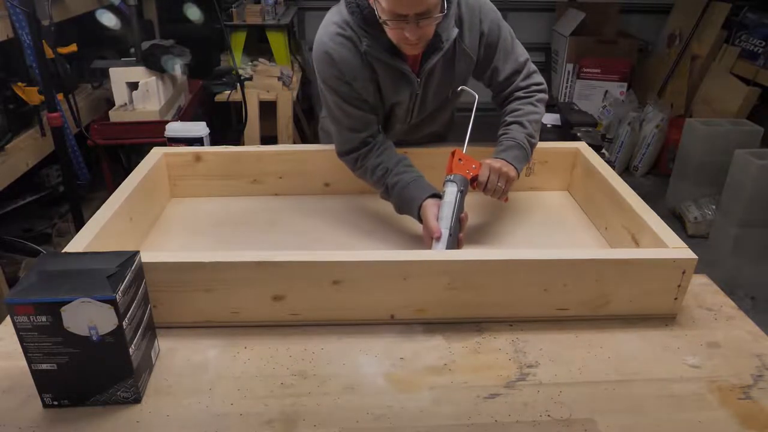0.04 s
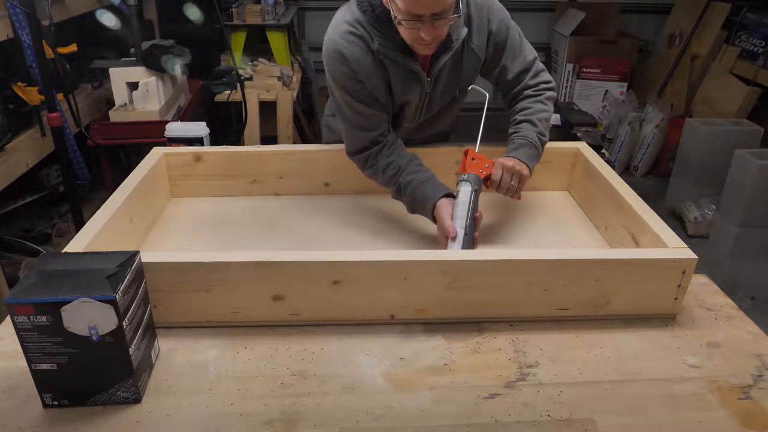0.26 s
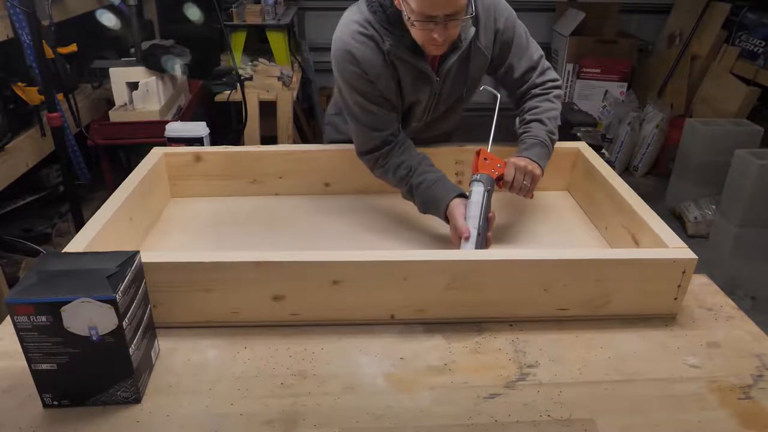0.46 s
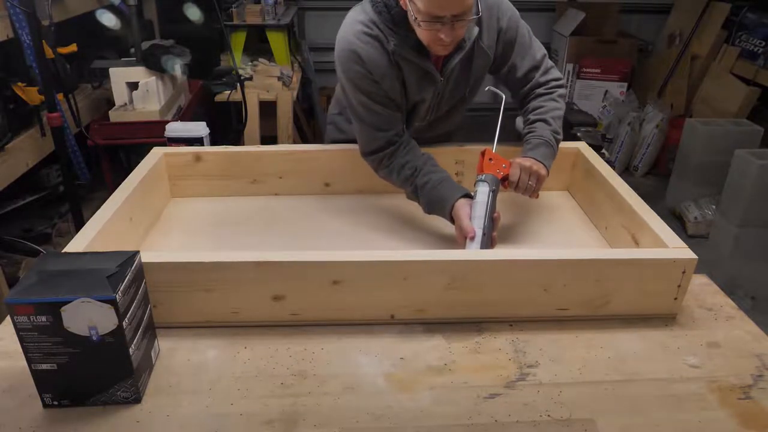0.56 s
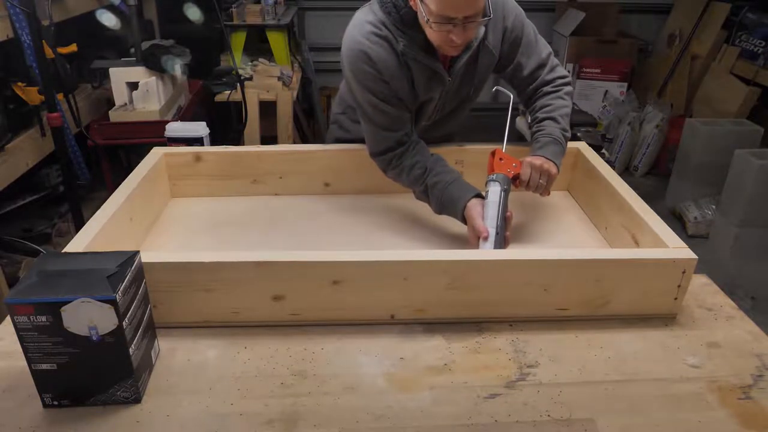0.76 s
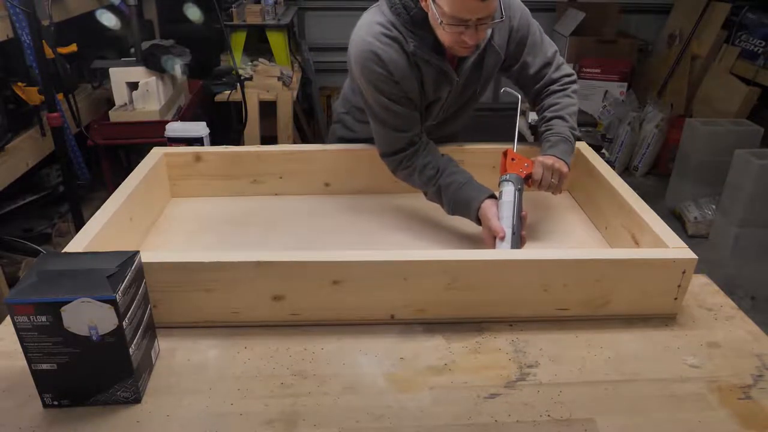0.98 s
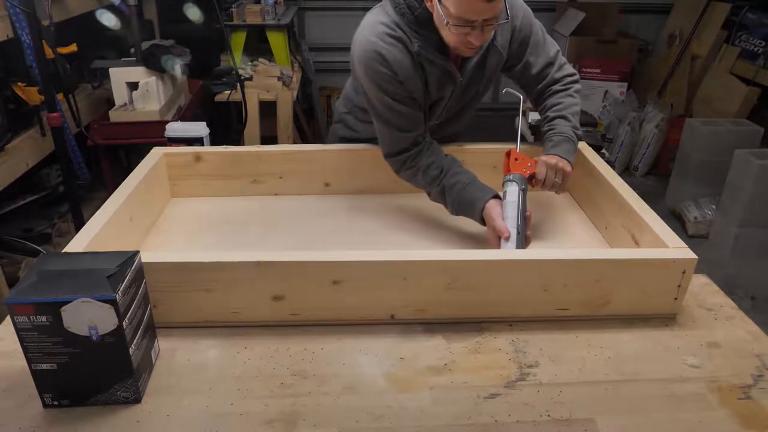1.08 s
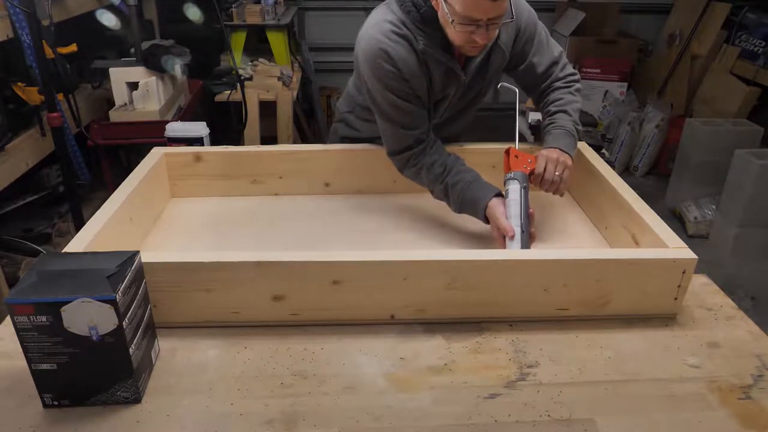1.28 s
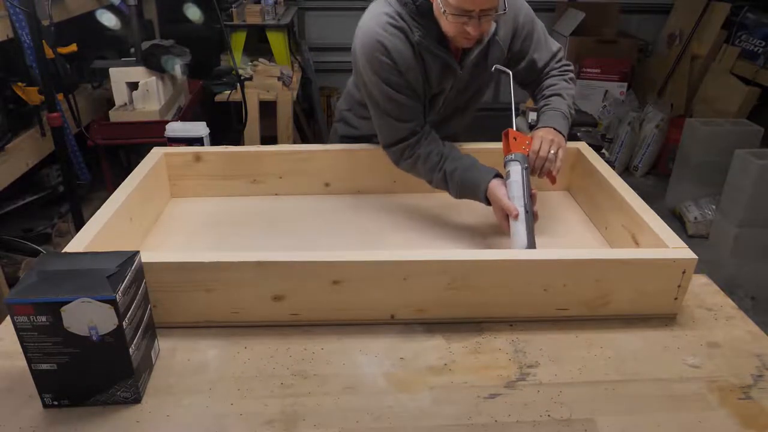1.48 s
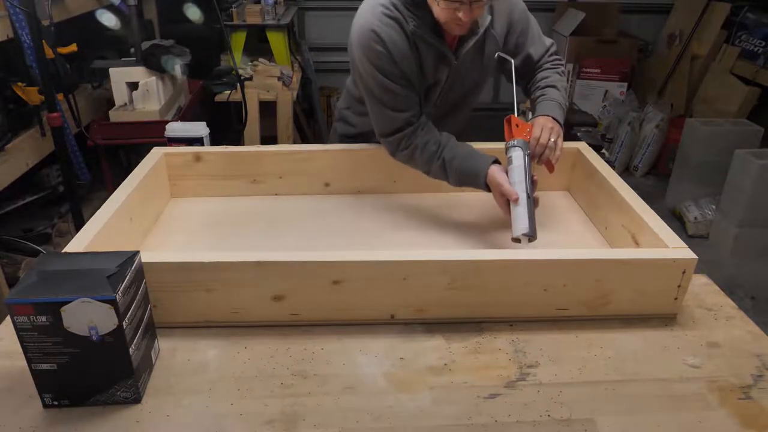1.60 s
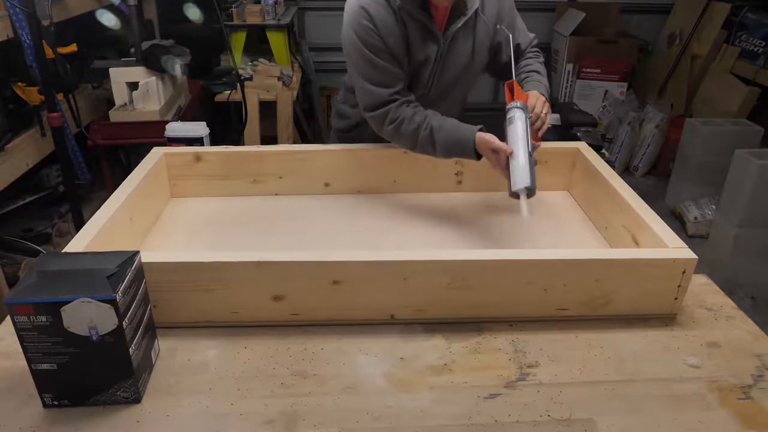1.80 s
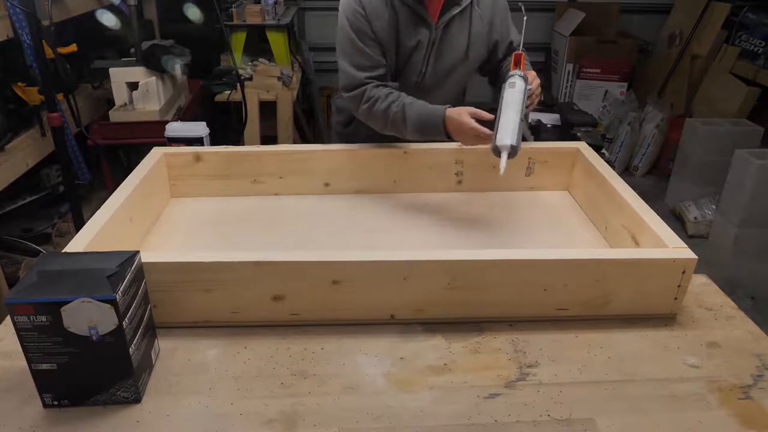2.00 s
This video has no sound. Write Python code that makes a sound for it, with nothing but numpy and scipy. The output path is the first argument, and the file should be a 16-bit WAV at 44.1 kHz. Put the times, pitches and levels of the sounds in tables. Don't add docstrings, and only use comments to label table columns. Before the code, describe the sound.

A caulking gun scrapes along a wooden box, boards humming low; a bright ratchet snap rings, small ticks follow, then a second, duller snap, cloth rustle and a faint lever clack, heard close in a reverberant garage.

```python
import sys
import numpy as np
from scipy import signal
from scipy.fft import rfft, irfft
from scipy.io import wavfile
from scipy.ndimage import uniform_filter1d

SR = 44100
rng = np.random.default_rng(int(sys.argv[2]) if len(sys.argv) > 2 else 0)


def attenuation_scalar(level_db):
    decades = np.asarray(level_db, float) / 20
    return 10 ** decades


def wrap_up_sound(samples):
    columns = np.atleast_2d(samples).T
    tamed = np.clip(columns, -1, 1)
    steps = np.round(tamed * 32767).astype(np.int16)
    wavfile.write(sys.argv[1], SR, steps)


N = 90404
SPAN, TAPS = 4096, 1024


def evened(x):
    return x / np.sqrt(np.mean(x ** 2) + 1e-20)


def read(points, hz):
    f, value = np.transpose(points)
    return np.interp(np.log(hz + 1), np.log(f + 1), value)


def curve(points):
    return np.interp(np.arange(N) / SR, *np.transpose(points))


def colour(x, points):
    hz = abs(np.fft.fftfreq(2 * TAPS, 1 / SR))
    low_end = (points[0][0] / 2, points[0][1] - 20)
    log_gain = np.log(attenuation_scalar(read([low_end] + list(points), hz)))
    phase = -signal.hilbert(log_gain).imag
    response = np.fft.ifft(np.exp(log_gain + 1j * phase)).real[:TAPS]
    return signal.oaconvolve(x, response)[:len(x)]


def ring(x, peaks, damping):
    out = np.zeros(len(x))
    for k, (hz, width, db) in enumerate(peaks):
        r = np.exp(-np.pi * width * damping / SR)
        poles = [1, -2 * r * np.cos(2 * np.pi * hz / SR), r * r]
        out += (-1) ** k * attenuation_scalar(db) * signal.lfilter([1 - r, 0, r - 1], poles, x)
    return out


def slips(size, per_s, spread_db):
    chance, draw, sign = rng.random((size, 3)).T
    level_db = spread_db * np.minimum(-np.log(draw + 1e-9), 4)
    return (chance < per_s / SR) * np.sign(sign - .5) * attenuation_scalar(level_db)


def pair(a, b, same):
    c = np.clip(read(same, np.fft.rfftfreq(len(a), 1 / SR)), 0, .97)
    mid = rfft(a) * np.sqrt((1 + c) / 2)
    side = rfft(b) * np.sqrt((1 - c) / 2)
    return np.array([irfft(mid + side, len(a)), irfft(mid - side, len(a))])


def placed(s, sound):
    out = np.zeros(N + len(sound))
    out[round(s * SR):][:len(sound)] = sound
    return out[:N]


# f/Hz, level/dB
AIR_SPECTRUM = [(25, -55), (70, -16), (110, -11), (234, -2.5), (340, -12), (1000, -17.5), (11400, -25),
                (15250, -27.5), (15600, -78)]
# f/Hz, coherence
AIR_LIKENESS = [(60, 0.74), (240, 1), (950, 0.68), (3770, 0.46), (15000, 0.57)]


def air():
    a, b = (colour(v, AIR_SPECTRUM) for v in rng.standard_normal((2, N)))
    return attenuation_scalar(-59) * evened(pair(a, b, AIR_LIKENESS))


# t/s, level/dB
PRESSURE = [(0, -46.5), (.29, -45.5), (.62, -47.5), (.77, -45), (.9, -41.5), (1.0, -43.5), (1.1, -46),
            (1.25, -57.5), (1.33, -67), (1.38, -51.5), (1.45, -64), (1.6, -73)]
# t/s, level/dB
BITE = [(0, -4), (.3, -1), (.5, -1), (.75, -0.5), (1.05, 2), (1.3, -3.5)]
# f/Hz, width/Hz, level/dB
BOARD_MODES = [(111, 38.6, 2), (230, 18, -7), (353, 110, 0), (486, 23, 0.5), (610, 32, -2), (668.6, 46, 5),
               (900, 79, -4)]
# f/Hz, level/dB
SCRAPE_SPECTRUM = [(300, -11.5), (700, -6.5), (1370, -4.5), (1800, -12.5), (2200, -14.5), (2700, -14.5),
                   (5000, -24), (9000, -39.5), (15000, -36)]


def nozzle():
    after_end = np.maximum(np.arange(N) / SR - PRESSURE[-1][0], 0)
    push_db = curve(PRESSURE) - 80 * after_end
    drive = slips(N, per_s=900, spread_db=1.5)
    scrape = evened(drive) + 1.6 * rng.standard_normal(N)
    scrape = evened(colour(scrape, SCRAPE_SPECTRUM))
    radiation = [(150, -3.5), (950, -2.5), (1080, -10), (4000, -22.5)]  # f/Hz, level/dB
    hum = evened(colour(ring(drive, BOARD_MODES, 0.85), radiation))
    scrape_db = 0.58 * (push_db + 49.5) - 49 - 3.5 + curve(BITE)
    return attenuation_scalar(push_db - 3) * hum + attenuation_scalar(scrape_db) * scrape


def snap(s, length, ring_db, crack_db, sag, room_db, parts, crack):
    t = np.arange(SPAN) / SR
    shape = np.minimum(t / 0.00025, 1) * np.exp(-sag * t / length) / (1 + (t / length) ** 8)
    clicks = slips(SPAN, per_s=1500, spread_db=7.5) + 0.26 * rng.standard_normal(SPAN)
    z = rfft(shape * clicks)
    flat = z / np.sqrt(uniform_filter1d(abs(z) ** 2, size=40))
    chatter = evened(np.sqrt(shape) * irfft(flat, SPAN))
    chatter = chatter * (1 + 0.89 * np.exp(-t / .0012))
    blow = 1. * (t == 0)
    heard = []
    for v in (chatter, blow):
        ringing = attenuation_scalar(ring_db) * evened(ring(v, parts, damping=1.43))
        cracking = attenuation_scalar(crack_db) * evened(colour(v, crack))
        heard.append(placed(s, (ringing + cracking) * np.sqrt(length * SR / SPAN)))
    return np.array(heard) * attenuation_scalar([[0], [room_db]])


# f/Hz, width/Hz, level/dB
PAWL_MODES = [(2300, 123, -5), (2610, 115, -5), (3720, 47, -2.5), (6075, 60, -3), (8260, 77, -5),
              (9663, 280, 5.5), (9857, 230, 4.5), (10140, 33, 2), (11860, 93, -2.5), (14100, 200, -3)]
PLATE_MODES = [(683, 25, -1), (2470, 24, 11.5), (3300, 110, -24), (6550, 60, -34), (8680, 35, 2),
               (10450, 95, 6.5), (12670, 140, 4), (13500, 150, 3.5), (14300, 60, 6)]
LEVER_MODES = [(1480, 48, 7), (1860, 90, 2), (2380, 27, 3), (3850, 150, -6), (8200, 100, -14.5),
               (9500, 36, 1), (14500, 210, 15)]
# f/Hz, level/dB
PAWL_NOISE = [(530, -48), (900, -24.5), (1120, -24), (2660, -14), (6110, -8), (7230, -9), (9650, -9),
              (16000, -17.5)]
PLATE_NOISE = [(500, -10.5), (1100, -7.5), (2520, -3.5), (5000, -8), (9240, -16), (12700, -6),
               (15200, -11.5), (16000, -17)]
LEVER_NOISE = [(500, -16), (933, -16), (1790, -5.5), (4500, -19), (6000, -26), (14200, -21), (15600, -58)]
SNAP_ONSETS = [
    .2083,
    1.042,
    1.4437,
]
CHATTER_LENGTHS = [.0058, .0068, .022]
# ring level/dB, crack level/dB, sag of the chatter, room level/dB
SNAP_LEVELS = [
    (-17, -20.5, .05, 2),
    (-23.5, -25, .05, -1.5),
    (-47.5, -45.5, 1.7, 8),
]


def snaps():
    bodies = [(PAWL_MODES, PAWL_NOISE), (PLATE_MODES, PLATE_NOISE), (LEVER_MODES, LEVER_NOISE)]
    events = zip(SNAP_ONSETS, CHATTER_LENGTHS, SNAP_LEVELS, bodies)
    return sum(snap(s, length, *levels, *body) for s, length, levels, body in events)


# f/Hz, level/dB, t60/s
ROD_PARTIALS = [(3630, -44, 0.59), (3760, -73, 0.23), (5820, -34, .55), (6016, -54, 0.26), (6000, -33, 0.4)]


def rod():
    t = np.arange(SR // 2) / SR
    partials = [attenuation_scalar(db - 60 * t / t60) * np.sin(2 * np.pi * hz * t) for hz, db, t60 in ROD_PARTIALS]
    return placed(SNAP_ONSETS[0], sum(partials))


def tick(s, db, hz, width, length):
    t = np.arange(SPAN) / SR
    puff = rng.standard_normal(SPAN) * np.exp(-(t / length) ** 2) * np.minimum(t / length * 4, 1)
    body = [(hz, width, 0)]
    sound = evened(ring(ring(puff, body, 0.36), body, 1.27))
    return placed(s, attenuation_scalar(db - 3.5) * sound * np.sqrt(length * SR / SPAN))


# t/s, level/dB, f/Hz, width/Hz, length/s
SMALL_PARTS = [(0.48, -47, 2040, 600, 0.0044), (0.5336, -50.5, 2020, 900, 0.0062),
               (0.619, -51, 2110, 600, 0.0022), (0.6407, -57, 1470, 500, 0.0032),
               (0.698, -44, 2120, 400, 0.0021), (0.7225, -63, 2030, 500, 0.0034),
               (.7573, -48, 2230, 700, 0.0043), (0.7974, -54, 2160, 700, 0.0039),
               (0.842, -44, 2200, 600, 0.0016), (1.255, -52, 2210, 611, 0.059),
               (1.291, -45.5, 3120, 5770, 0.008), (1.357, -57.5, 10500, 7000, 0.029),
               (1.576, -56, 10100, 7000, 0.0029), (1.58, -70, 2900, 2500, 0.0061),
               (0.935, -43.5, 254.4, 60, 0.06), (1.042, -49.5, 246, 81, 0.015),
               (1.715, -68, 11900, 5000, 0.035), (1.417, -49, 2520, 4000, .025),
               (1.427, -52, 11000, 9000, 0.021)]


def small_parts():
    return sum(tick(*row) for row in SMALL_PARTS)


# t/s, level/dB
SLEEVE_MOTION = [(1.15, -69), (1.3, -50.5), (1.5, -65), (1.65, -95), (1.77, -61.5), (1.87, -84),
                 (1.97, -58.5), (2.05, -60)]
# f/Hz, level/dB
CLOTH_SPECTRUM = [(500, -6), (1540, -1), (2300, -4), (5000, -20), (15200, -46), (15600, -86)]


def sleeve():
    rub = evened(slips(N, per_s=2000, spread_db=3)) + rng.standard_normal(N)
    return attenuation_scalar(curve(SLEEVE_MOTION)) * evened(colour(rub, CLOTH_SPECTRUM))


# f/Hz, level/dB
WALL_SPECTRUM = [(1000, -7), (4000, -8.5), (9000, -15), (13000, -5)]


def box_wall(x):
    taps = rng.standard_normal(TAPS) * np.exp(-np.arange(TAPS) / SR / 0.0015)
    reflected = signal.oaconvolve(x, taps / np.linalg.norm(taps))[:N]
    side = colour(reflected, WALL_SPECTRUM)
    return np.array([side, -side])


# f/Hz, t60/s
GARAGE_T60 = [(300, 0.57), (1000, 0.39), (2500, 0.43), (6000, .48), (10000, 0.34), (13500, 0.26),
              (15500, 0.093), (16500, 0.13)]
# f/Hz, coherence
GARAGE_LIKENESS = [(300, 1), (1000, 0.71), (2500, 0.79), (5000, 0.72), (9000, 0.82), (13000, 0.85)]


def garage(x):
    first_wall_s, build_s = 0.0055, 0.012
    t = np.arange(SR) / SR
    taps = pair(*rng.standard_normal((2, SR)), GARAGE_LIKENESS)
    hz, at, z = signal.stft(taps, SR, nperseg=256)
    decay = attenuation_scalar(-60 * at / read(GARAGE_T60, hz)[:, None])
    tail = signal.istft(z * decay, SR, nperseg=256)[1][:, :SR]
    tail = tail * (t > first_wall_s) * (1 - .5 * np.exp(-t / build_s))
    return signal.fftconvolve(x[None], tail / np.linalg.norm(tail[0]), axes=1)[:, :N]


def scene():
    direct, feed = snaps()
    ticks = small_parts()
    drag = nozzle() + sleeve()
    near = direct + ticks + attenuation_scalar(-2) * drag + rod()
    room = garage(feed + attenuation_scalar(-3.5) * ticks + attenuation_scalar(-7.5) * drag)
    balance = attenuation_scalar([[.2], [-.2]])
    return near * balance + box_wall(near) + room + air()


def band_limit(x):
    return signal.sosfilt(signal.butter(12, 17120, fs=SR, output="sos"), x)


def record(dry):
    bass_cut = signal.butter(3, 50, "high", fs=SR, output="sos")
    mix = signal.sosfilt(bass_cut, dry)
    mix = signal.oaconvolve(mix, signal.firwin(255, 16100, fs=SR)[None], "same")
    return band_limit(mix)


dry = scene()
out = record(dry)
wrap_up_sound(out)
```